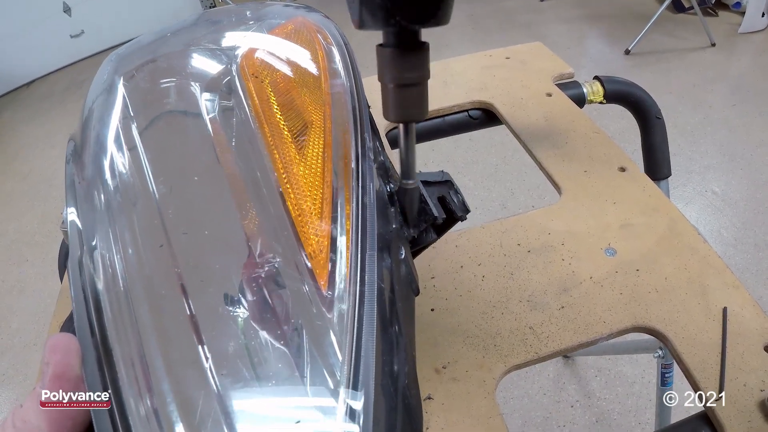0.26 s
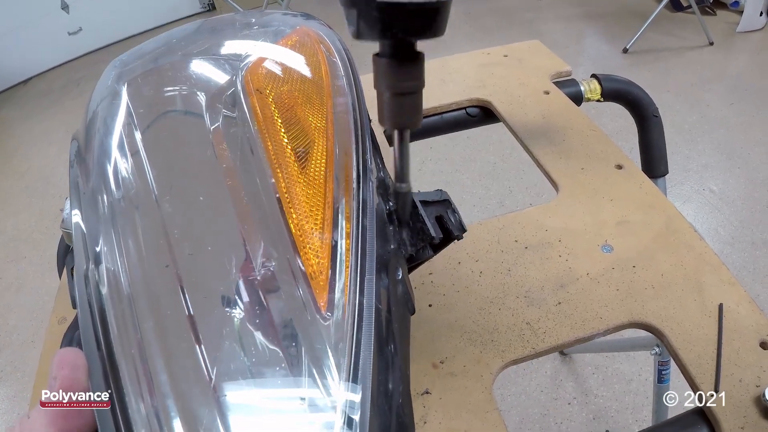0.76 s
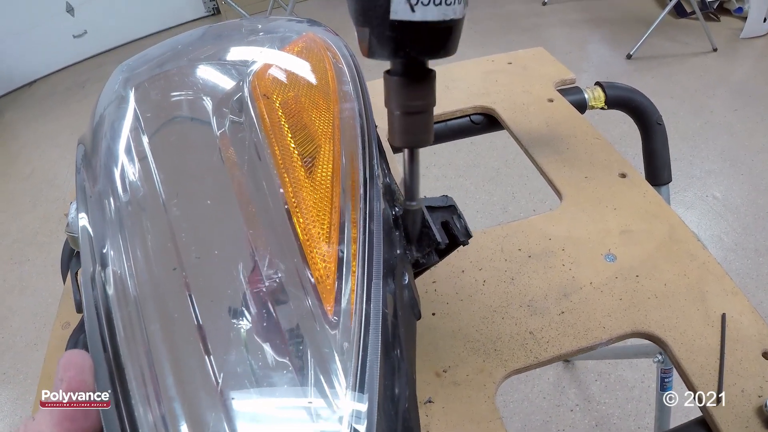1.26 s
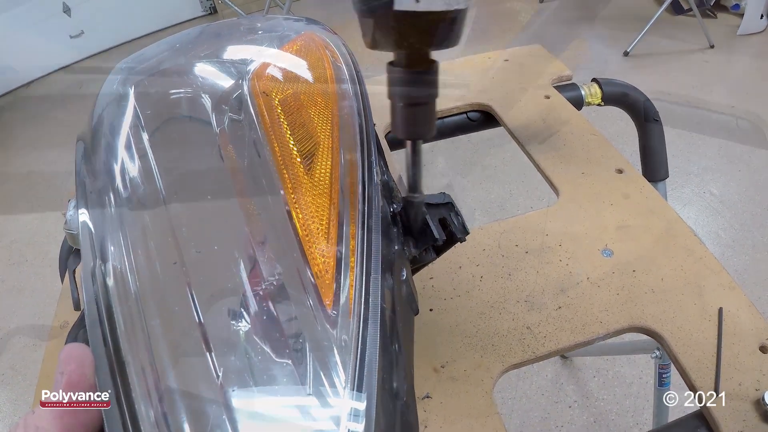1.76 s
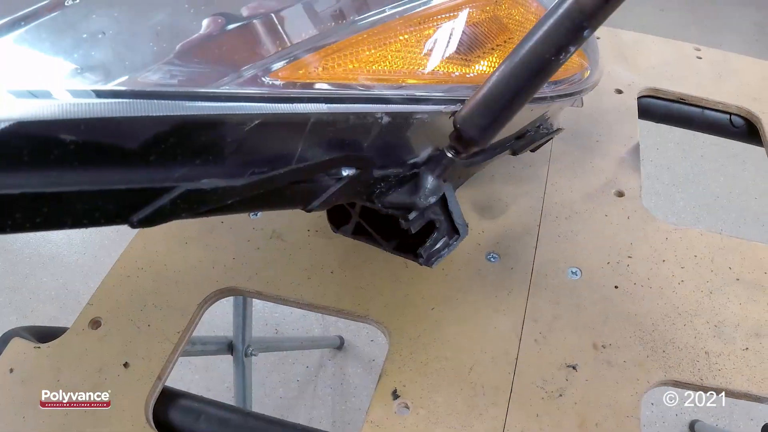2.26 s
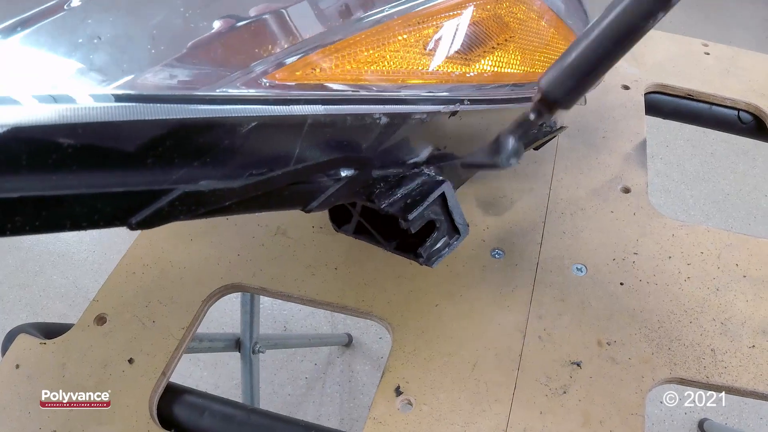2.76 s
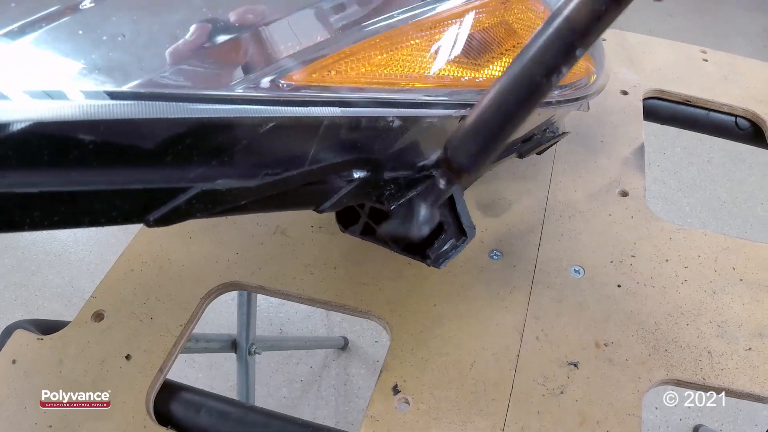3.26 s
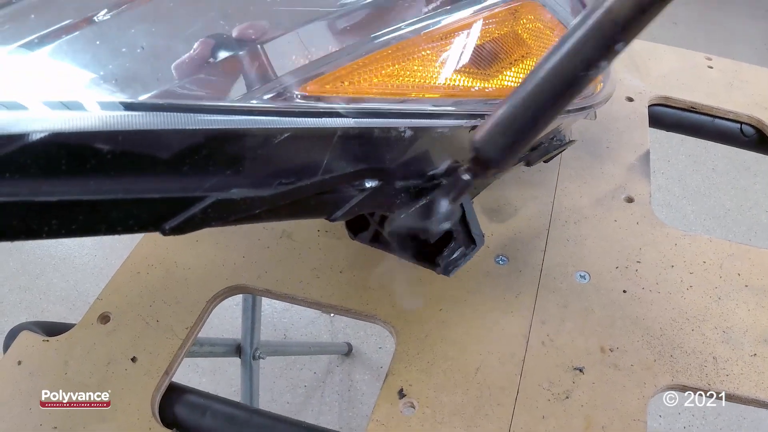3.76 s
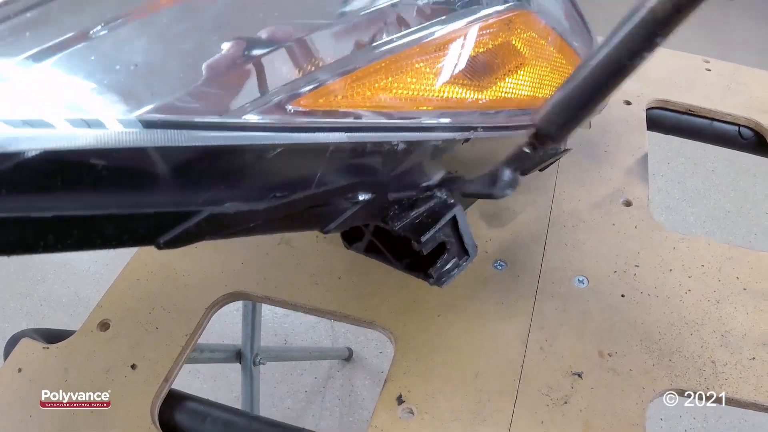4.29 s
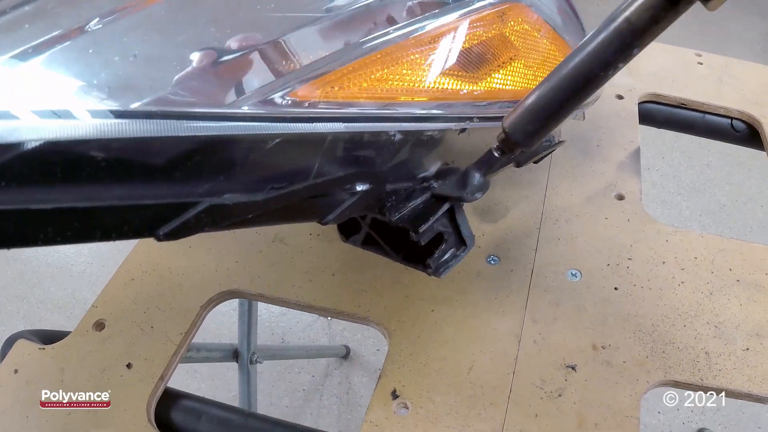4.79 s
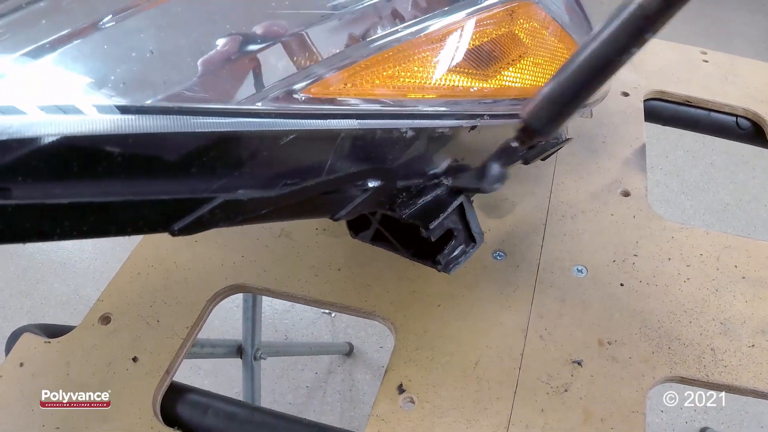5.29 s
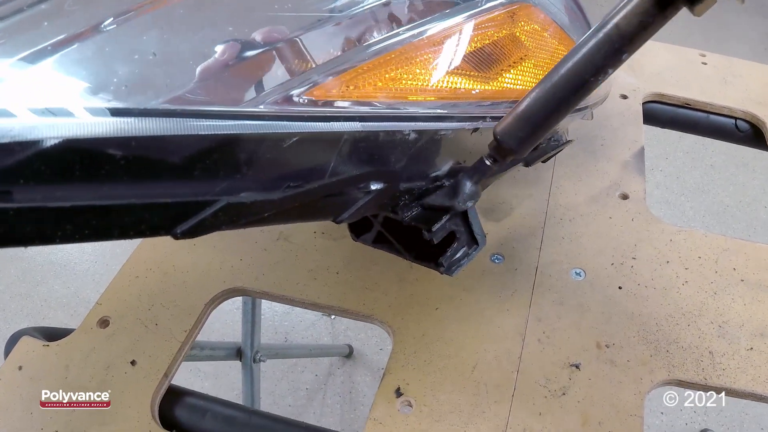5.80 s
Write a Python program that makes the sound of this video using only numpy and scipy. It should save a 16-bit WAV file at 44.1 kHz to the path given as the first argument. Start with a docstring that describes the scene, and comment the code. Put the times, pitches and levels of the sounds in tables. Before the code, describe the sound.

High pneumatic whine with rushing exhaust and gritty bites on a plastic tab, replaced by a steady, ringing jet hiss that swells and drops back.

```python
"""A motor whines, exhaust air rushes, and a burr rasps, bites and squeals on a plastic headlight tab: an air
die grinder, as shaft harmonics, knocks once a cycle, chip noise and air noise. It fades into a hot gas plastic
welder, filtered jet noise and nozzle resonances, whose hiss swells and drops back twice. A few small pops are
damped sines; low workshop noise lies beneath."""
import sys
import numpy as np
from scipy import signal
from scipy.fft import rfft, irfft
from scipy.io import wavfile

SR = 44100
rng = np.random.default_rng(int(sys.argv[2]) if len(sys.argv) > 2 else 0)


def put_to_file(sound):
    """Save the sound as 16-bit audio at rate SR, in the file named by the first command-line argument."""
    columns = np.atleast_2d(sound).T  # one column per channel
    safe = np.clip(columns, -1, 1)
    whole_steps = np.round(safe * 32767)
    wavfile.write(sys.argv[1], SR, whole_steps.astype(np.int16))


N = 266364
T = np.arange(N) / SR
FREQS = np.fft.rfftfreq(N, 1 / SR)


def amp(db):
    """Decibels to gain."""
    return 10 ** (np.asarray(db) / 20)


def unit(x):
    """Scale to rms 1."""
    return x / np.sqrt(np.mean(x ** 2))


def curve(rows):
    """Timed (s, value) points joined by straight lines."""
    times_s, values = np.transpose(rows)
    return np.interp(T, times_s, values)


def noise():
    """White noise."""
    return rng.standard_normal(N)


def walk(corner_hz):
    """Smooth random drift of rms 1: noise low-passed at corner_hz."""
    return unit(irfft(rfft(noise()) / (1 + (FREQS / corner_hz) ** 4), N))


def colour(x, points):
    """Minimum-phase (causal) filter through (Hz, dB) points."""
    hz, db = np.transpose(points)
    log_gain = np.log(amp(np.interp(np.log(FREQS + 1), np.log(hz), db)))
    cepstrum = irfft(log_gain, N)
    cepstrum[1:N // 2] *= 2
    cepstrum[N // 2 + 1:] = 0
    return irfft(rfft(x) * np.exp(rfft(cepstrum)), N)


def ring(x, modes):
    """Parallel band-pass resonances (Hz, width Hz, dB)."""
    response = 0
    for f, width, db in modes:
        damping = 1j * FREQS * width
        response = response + amp(db) * damping / (f * f - FREQS ** 2 + damping)
    return irfft(rfft(x) * response, N)


def contacts(rows, edge_s):
    """Summed gain of short contacts (start s, length s, dB) with linear edges."""
    total = 0
    for start_s, length_s, db in rows:
        inside_s = length_s / 2 - abs(T - start_s - length_s / 2)
        total = total + amp(db) * np.clip(inside_s / edge_s + .5, 0, 1)
    return total


def workshop():
    """Low room noise, louder round the welder; only its bass differs between left and right."""
    # room noise: t/s, level/dB
    room_level = [(0, -79), (1.8, -75), (1.96, -64.5), (6.04, -62)]
    mid = unit(colour(noise(), [(20, -12), (70, -1), (115, -1), (200, -3.5), (400, -8.0), (2000, -23.0)]))
    side = unit(colour(noise(), [(25, 4), (100, -7), (250, -10.5), (500, -24), (1500, -68)]))
    stereo = mid + amp(-9.0) * side * np.array([[1], [-1]])
    return amp(curve(room_level) + 1.0 * walk(10)) * stereo


def pops():
    """Each small tick or pop is a brief damped ring."""
    # pops: t/s, level before envelope/dB, f/Hz, decay/s
    pop_rows = [(.097, -20, 2200, .003), (1.958, -46, 120, .012), (3.54, -27, 3000, .0008),
                (3.818, -19.5, 530, .0016), (4.088, -22, 2050, .0014), (4.128, -46, 120, .012),
                (5.897, -47, 120, .012)]
    out = 0
    for start_s, db, hz, decay_s in pop_rows:
        age_s = np.maximum(T - start_s, 0)
        rise = 1 - np.exp(-2 * hz * age_s)  # time constant: half a cycle
        decay = np.exp(-np.minimum(age_s / decay_s, 20))
        out = out + amp(db) * rise * decay * np.sin(2 * np.pi * hz * age_s)
    return out


def sizzle():
    """Close to the plastic the jet breaks into a grainy, higher hiss."""
    # spells of sharper hiss on the tab: t/s, length/s, level/dB
    spells = [(3.52, 0.22, -47), (3.98, 0.12, -50), (5.64, 0.24, -47.5)]
    spray = ring(noise() * amp(4.3 * walk(600)), [(4180, 440, 0)])
    return contacts(spells, edge_s=.06) * unit(spray)


def swell():
    """Rise of the hiss in dB: climbs steadily, holds, and drops at once at the next start."""
    # swell starts: t/s
    starts_s = [1.94, 4.097, 5.868]
    climb_db_per_s, climb_s = 7, 1.027
    age_s = np.zeros(N)
    for start_s in starts_s:
        age_s = np.where(T >= start_s, T - start_s, age_s)
    return climb_db_per_s * np.minimum(age_s, climb_s)


def gas_jet():
    """Turbulent gas noise; short reflections off nearby surfaces ripple its spectrum."""
    # jet spectrum: f/Hz, relative density/dB
    jet_spectrum = [(30, -14), (110, -9.5), (350, -8.5), (520, -1.5), (900, 1), (3300, -0.5), (4500, -2.5),
                    (5900, -4.5), (6350, -7.5), (8200, -4.5), (9600, -7.5), (12200, -15), (15700, -17.5)]
    # amplitude share arriving by nearby surfaces: f/Hz, share/0-1
    reflected = [(1000, .2), (4000, 0.35), (7000, 0.51)]
    turbulence = colour(noise() * amp(1.3 * walk(1100)), jet_spectrum)
    # dense random reflections
    reflections = noise() * np.exp(-np.minimum(T / 0.048, 20))
    reflections /= np.sqrt(np.sum(reflections ** 2))
    share = np.interp(FREQS, *np.transpose(reflected))
    response = np.sqrt(1 - share ** 2) + share * rfft(reflections)
    return unit(irfft(rfft(turbulence) * response, N))


def nozzle_whistle():
    """Narrow nozzle resonances, each driven by its own noise."""
    # nozzle resonances: f/Hz, width/Hz, relative level/dB
    nozzle_modes = [(2952, 20, -7), (3615, 30, -6), (3747, 35, -1), (3836, 40, 0), (3905, 45, 0),
                    (4030, 110, -6), (4402, 30, -7), (5290, 60, -9), (5780, 60, -9), (6089, 35, -10),
                    (7106, 30, -10), (8183, 35, -8), (8485, 45, -7), (9308, 40, -11), (9535, 40, -12),
                    (11820, 90, -17)]
    return unit(sum(ring(noise(), [mode]) for mode in nozzle_modes))


def welder():
    """Gas jet and ringing nozzle swell together, the nozzle by a smaller rise."""
    jet_db, nozzle_db = -46, -49.5  # at the foot of a swell
    nozzle_share = 0.69  # of the rise in dB
    fade_start_s, fade_s = 1.834, 0.12
    rise_db = swell()
    jet = amp(jet_db + rise_db + 0.18 * walk(13.0)) * gas_jet()
    whistle = amp(nozzle_db + nozzle_share * rise_db + 0.69 * walk(5.5)) * nozzle_whistle()
    fade = np.clip((T - fade_start_s) / fade_s, 0, 1)
    return fade * (jet + whistle)


def exhaust():
    """Rush of exhaust air: shaped noise with a slight flutter."""
    # exhaust spectrum: f/Hz, relative density/dB
    air_spectrum = [(40, -23), (280, -19.5), (550, -8), (1000, -1), (2800, 2.5), (4200, -1), (5500, 2),
                    (7600, 2.5), (9400, -2), (11200, -4.5), (13000, -0.5), (14200, 2), (15700, -7.5)]
    # exhaust air: t/s, level/dB
    air_level = [(0, -39.3), (.4, -36.5), (.86, -35), (1.2, -37.3), (1.96, -39.5)]
    return amp(curve(air_level) + 0.18 * walk(40)) * unit(colour(noise(), air_spectrum))


def motor(phase, press_db, skid):
    """Vanes chop the air into fluttering tones; their balance follows the load on the burr."""
    # motor tones: multiple, rms cutting/dB, rms skidding/dB, follow/(dB per dB pressure)
    whine = [(1, -48, -49, 1.44), (2, -38.5, -48.5, 0.6), (4, -45.5, -38.5, 0.4), (8, -49.5, -52.5, .1),
             (12, -46.5, -47, -0.1)]
    out = 0
    for multiple, cut_db, skid_db, follow in whine:
        db = cut_db + (skid_db - cut_db) * skid + follow * press_db
        tone = np.sin(multiple * phase + .07 * walk(60))
        out = out + amp(db + 2.0 * walk(24)) * tone
    return np.sqrt(2) * out


def chatter(phase, rasp, squeals, press_db, skid):
    """The burr skips on the plastic: a sharp knock a cycle, stuttering lightly between loud squeals."""
    # chattering burr's spectrum: f/Hz, relative gain/dB
    burr_spectrum = [(600, -32), (1170, -22), (2350, -21), (3500, -25), (4700, -18), (5860, 0), (7040, -1),
                     (8200, -6), (9400, -5.5), (10550, -16), (11750, -12), (12900, -16), (15500, -26)]
    rub_db = -41 + press_db
    stutter_db, stutter_hz = 4, 64
    soft_knock_hz = 8200  # knocks are duller above this while cutting
    squeal_grip = amp(-5.0 + 1.3 * walk(70)) * squeals
    rub_grip = amp(rub_db + stutter_db * walk(stutter_hz) + 1.7 * walk(94))
    # contact point wanders, most when the cut is rough
    rough_wander = rasp / rasp.max() * 0.22 * walk(170)
    strike = phase + 0.097 * walk(20) + 0.011 * walk(410) + rough_wander
    knocks = sum(np.cos(k * strike) for k in range(1, 14))
    hard = unit(colour(knocks * amp(1.0 * walk(600)), burr_spectrum))
    soft = irfft(rfft(hard) / (1 + (FREQS / soft_knock_hz) ** 8), N)
    return (squeal_grip + rub_grip) * (skid * hard + (1 - skid) * soft)


def cutting(phase, rasp):
    """Chips tear off at random, mostly once a cycle, and ring the shell."""
    # burr digging in: t/s, length/s, level before +2 dB gain/dB
    bites = [(.098, 0.03, -39.5), (.362, .036, -41), (.553, 0.024, -37.5), (.738, .03, -42),
             (.881, 0.025, -38), (.943, .025, -36.5), (1.011, 0.044, -43), (1.288, 0.015, -40),
             (1.749, 0.013, -38.5), (1.859, 0.0087, -40.5)]
    # rasped plastic shell: f/Hz, width/Hz, relative level/dB
    shell_modes = [(1326, 48, 2), (1550, 170, -0.5), (2194, 93, 3), (2397, 76, 7), (3455, 340, 1)]
    chips = noise() * amp(1.4 * walk(200)) * (1 + 0.37 * np.cos(phase))
    rasp_depth = rasp * amp(2 * walk(49))
    bite_depth = amp(2.0) * contacts(bites, edge_s=.004)
    tone = [(100, -34), (300, -33), (1100, 3.5), (3700, -1.5), (8000, -14.0)]
    return np.hypot(rasp_depth, bite_depth) * unit(colour(ring(chips, shell_modes), tone))


def grinder():
    """Motor and burr share one shaft, which slows as the burr cuts or catches; exhaust air rushes along."""
    # hand pressing the burr on: t/s, pressure/dB
    pressure = [(0, -3), (.08, -8), (.11, -1), (.2, -2), (.36, 0), (.85, .5), (1.08, 3), (1.27, -1.5),
                (1.8, 1.5)]
    # burr from cutting to skidding: t/s, skid/0-1
    skid_rows = [(0, 0), (.64, .05), (.84, .45), (.96, 0.05), (1.12, 0.14), (1.22, .9), (1.7, 0.96)]
    # squeals as the burr catches: t/s, length/s, level before -5 dB gain/dB
    squeal_rows = [(.096, 0.015, -34.5), (.555, 0.035, -37.5), (.902, 0.026, -29), (.944, .012, -30.5),
                   (1.0, 0.014, -29.5), (1.116, 0.013, -32), (1.203, 0.087, -33.5), (1.328, 0.036, -29.5),
                   (1.403, 0.049, -30), (1.482, 0.0625, -29.5), (1.572, 0.053, -34), (1.66, 0.093, -31.5),
                   (1.773, 0.033, -28.5), (1.826, 0.026, -31), (1.875, 0.073, -36)]
    free_hz, wander_hz = 1179.5, 0.69  # whine without load, and its drift
    cut_sag_hz, squeal_sag_hz = 7.0, 5.0  # full cut, loudest squeal
    rasp_db, rasp_skid_db = -42.5, -7.0  # rasp, and its change when skidding
    end_s, fade_s = 2.044, 0.14
    press_db = curve(pressure)
    skid = curve(skid_rows)
    squeals = contacts(squeal_rows, edge_s=0.0037)
    load = amp(press_db + rasp_skid_db * skid)
    rasp = amp(rasp_db) * load
    sag_hz = cut_sag_hz * np.minimum(load, 1) + squeal_sag_hz * squeals / squeals.max()
    phase = 2 * np.pi * np.cumsum(free_hz - sag_hz + wander_hz * walk(17)) / SR
    burr = chatter(phase, rasp, squeals, press_db, skid) + cutting(phase, rasp)
    fade = np.clip((end_s - T) / fade_s, 0, 1)
    return fade * (motor(phase, press_db, skid) + burr + exhaust())


def scene():
    """Both tools, the sizzle and the pops in the middle, over the stereo room."""
    return workshop() + pops() + sizzle() + welder() + grinder()


def record(dry):
    """Steep elliptic low-pass cuts the top."""
    top_hz = 15680
    return signal.sosfilt(signal.ellip(16, .1, 80, top_hz, fs=SR, output="sos"), dry)


dry = scene()
out = record(dry)
put_to_file(out)
```